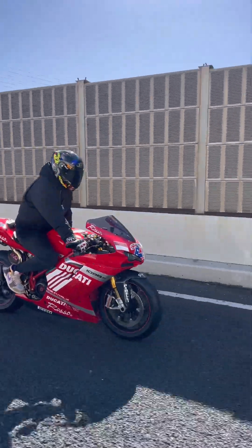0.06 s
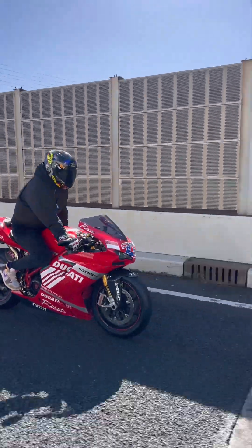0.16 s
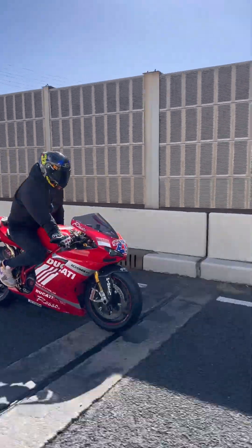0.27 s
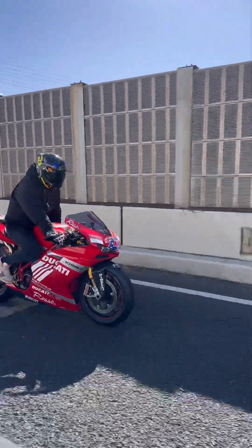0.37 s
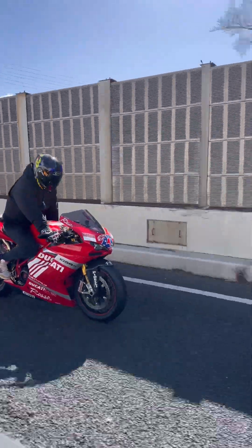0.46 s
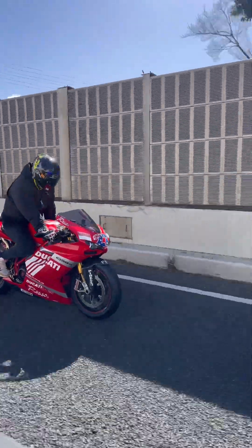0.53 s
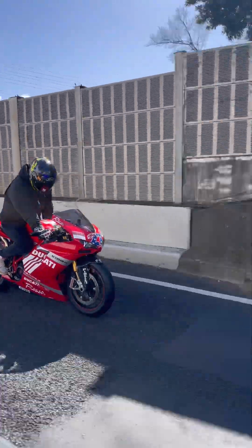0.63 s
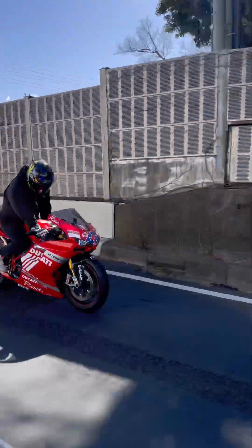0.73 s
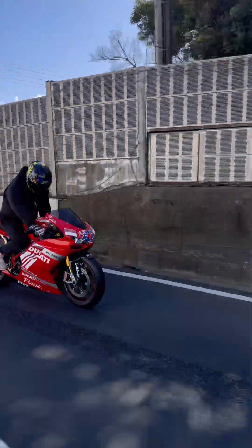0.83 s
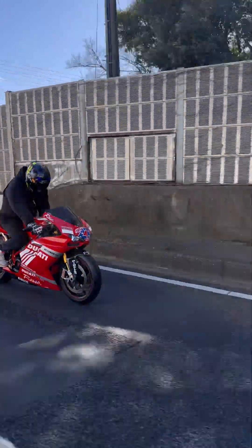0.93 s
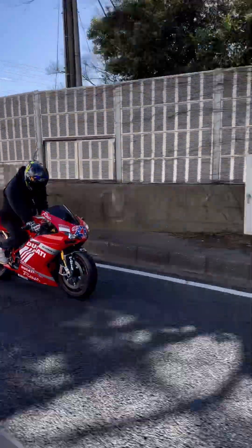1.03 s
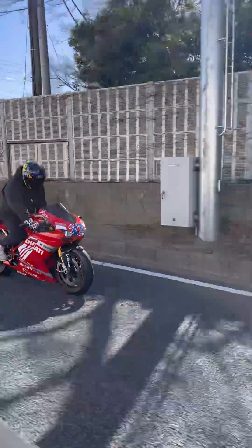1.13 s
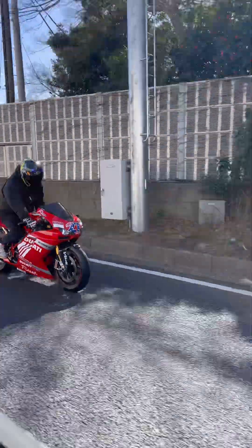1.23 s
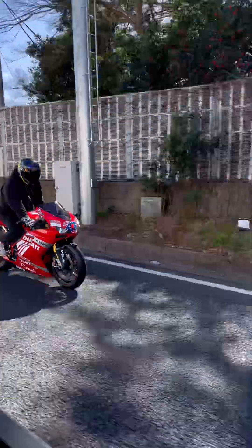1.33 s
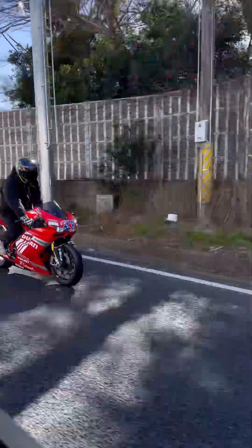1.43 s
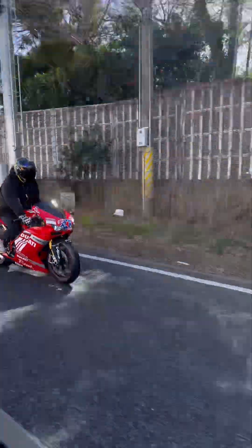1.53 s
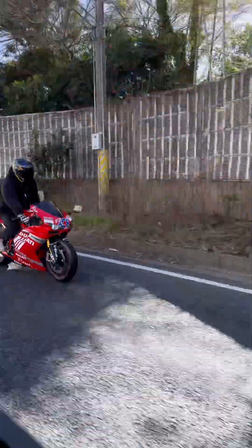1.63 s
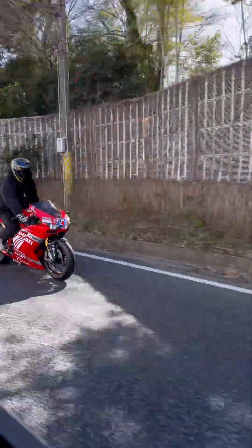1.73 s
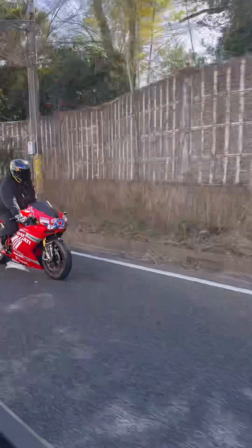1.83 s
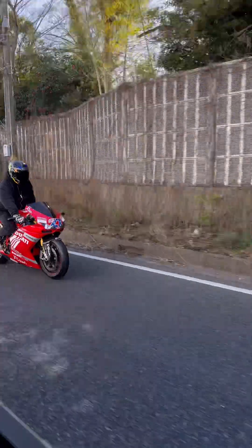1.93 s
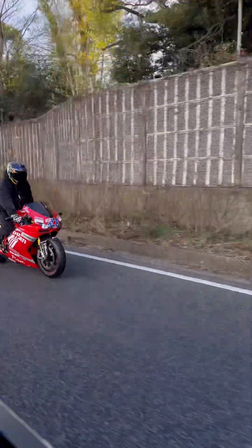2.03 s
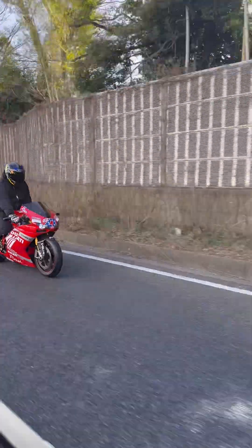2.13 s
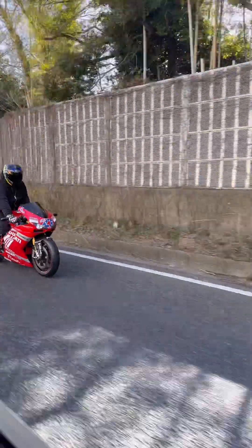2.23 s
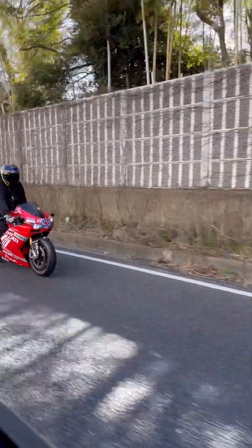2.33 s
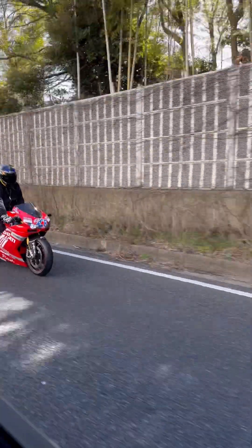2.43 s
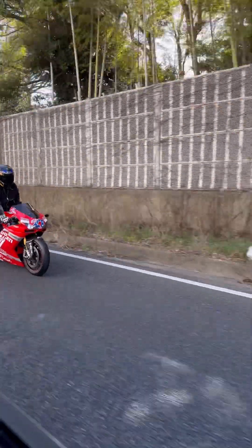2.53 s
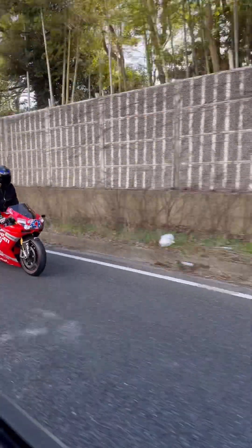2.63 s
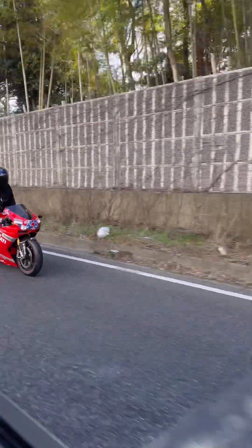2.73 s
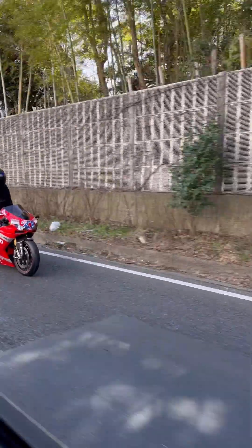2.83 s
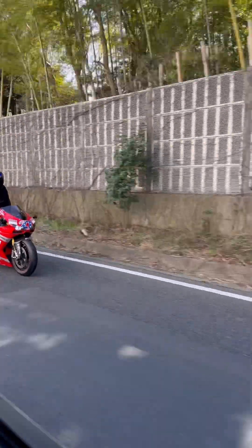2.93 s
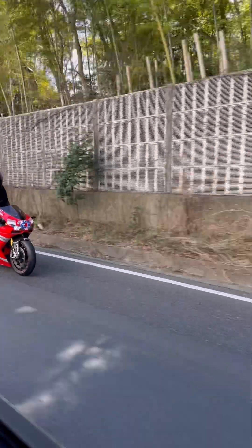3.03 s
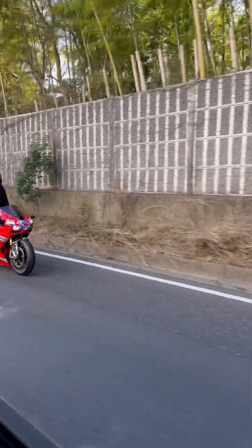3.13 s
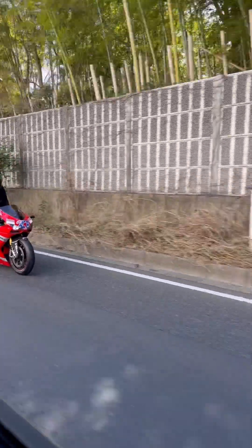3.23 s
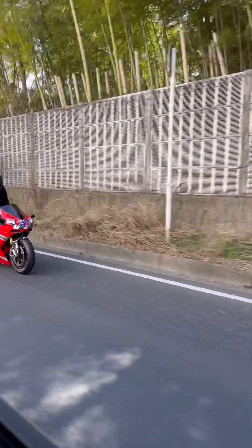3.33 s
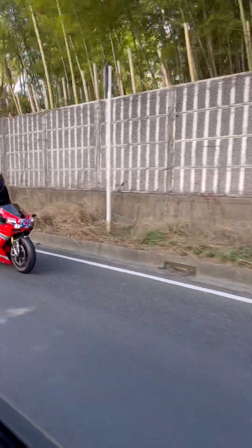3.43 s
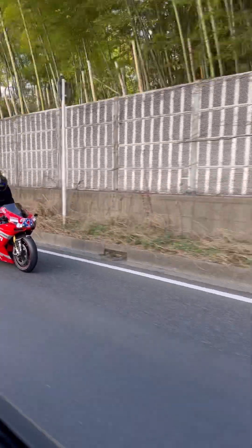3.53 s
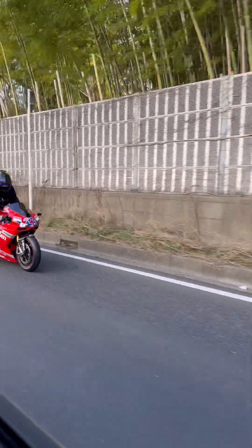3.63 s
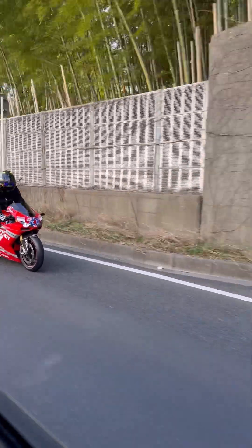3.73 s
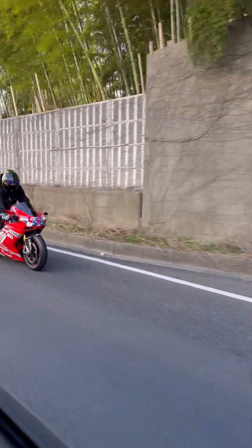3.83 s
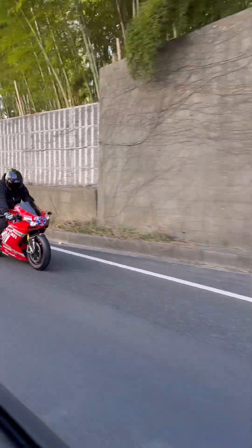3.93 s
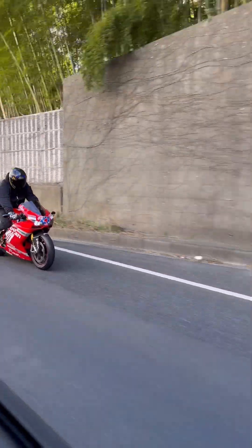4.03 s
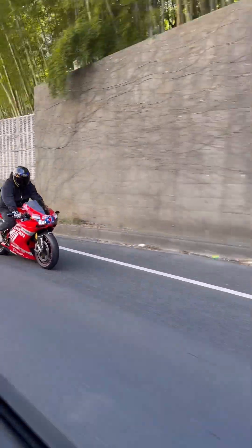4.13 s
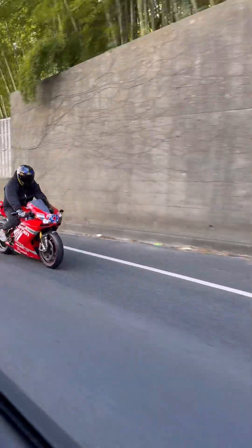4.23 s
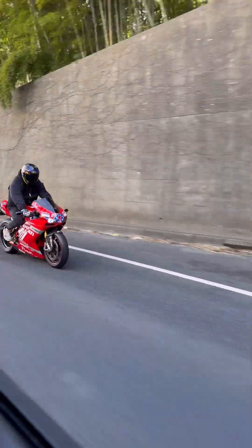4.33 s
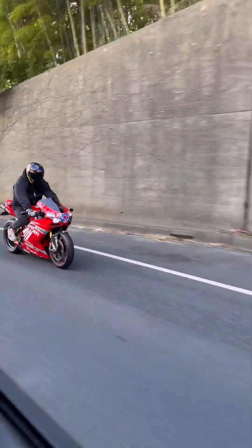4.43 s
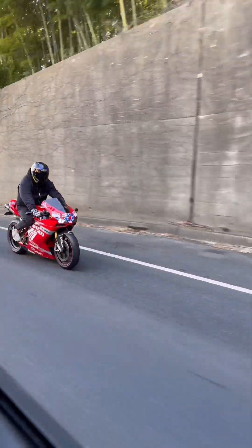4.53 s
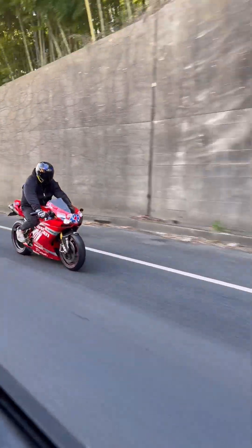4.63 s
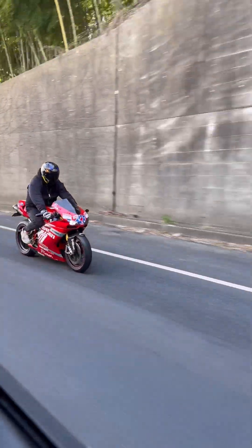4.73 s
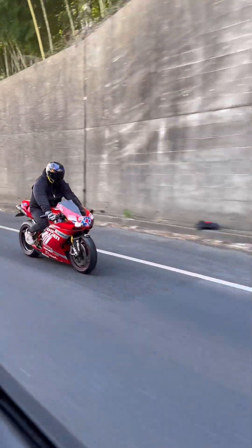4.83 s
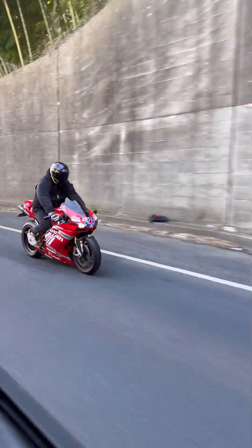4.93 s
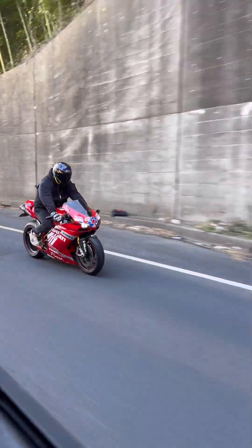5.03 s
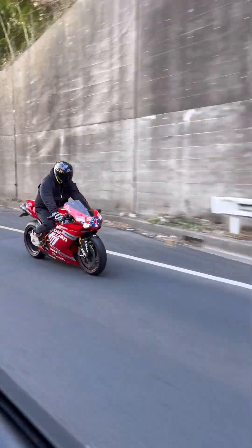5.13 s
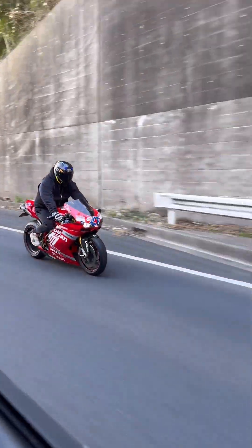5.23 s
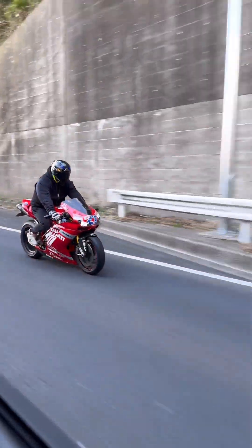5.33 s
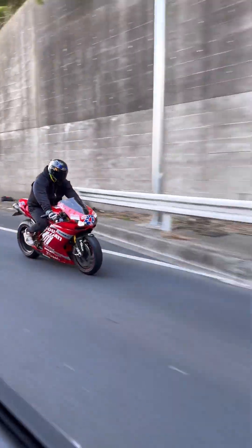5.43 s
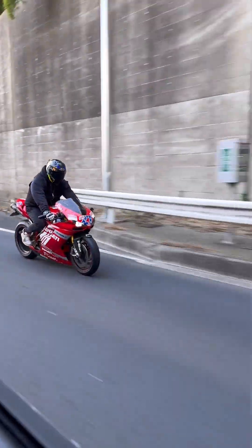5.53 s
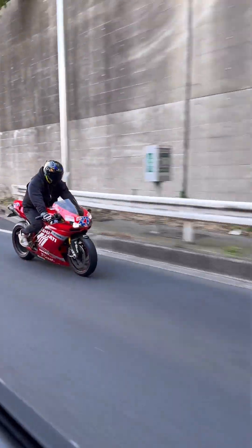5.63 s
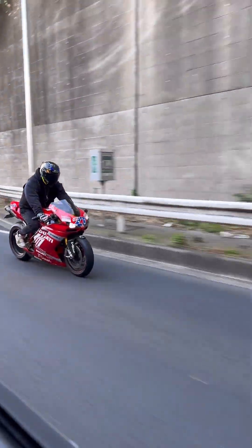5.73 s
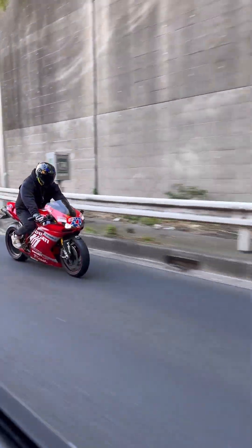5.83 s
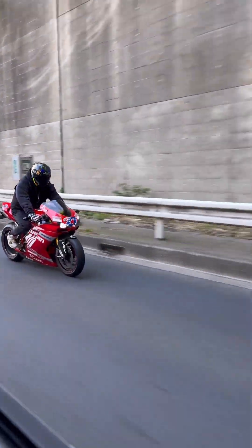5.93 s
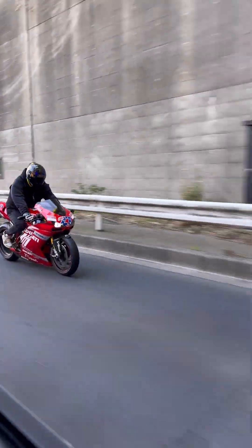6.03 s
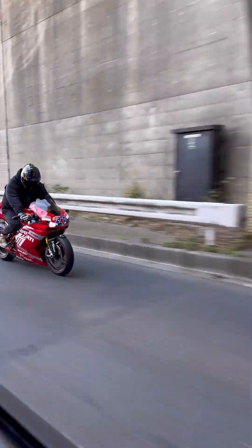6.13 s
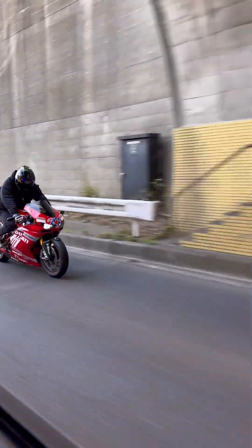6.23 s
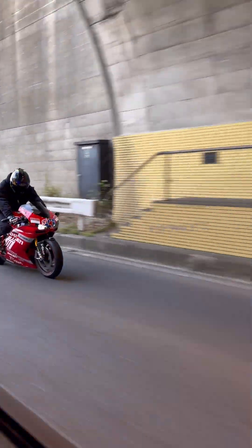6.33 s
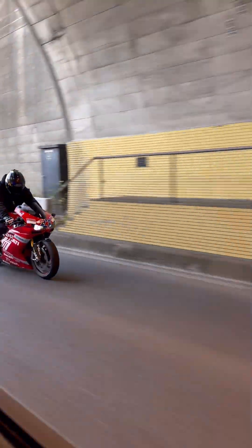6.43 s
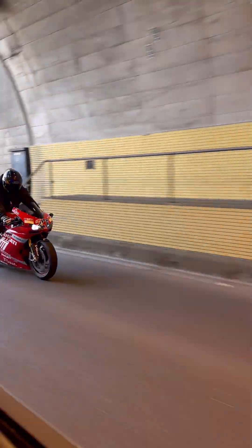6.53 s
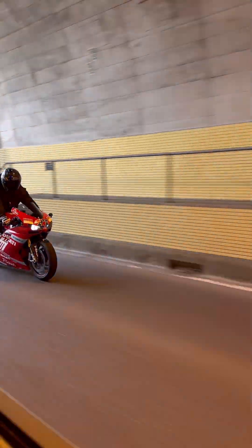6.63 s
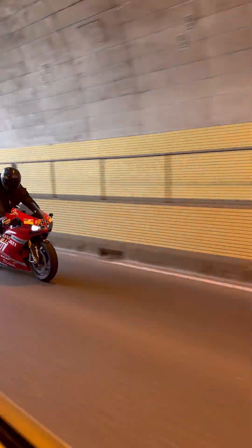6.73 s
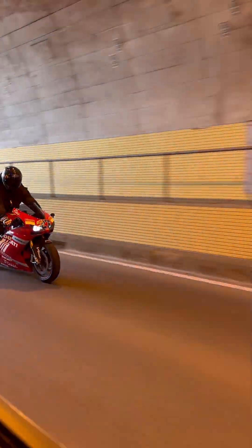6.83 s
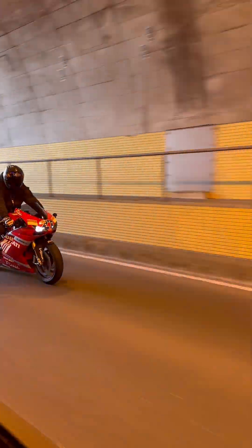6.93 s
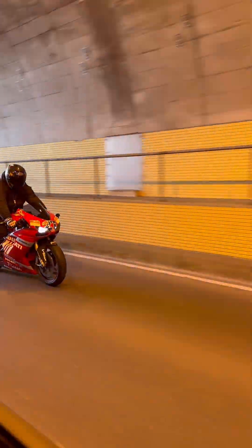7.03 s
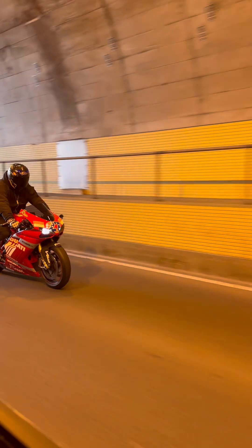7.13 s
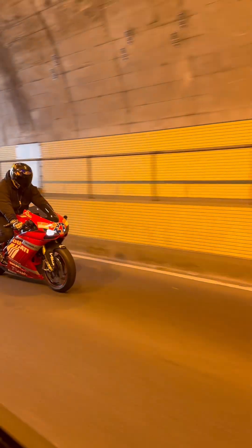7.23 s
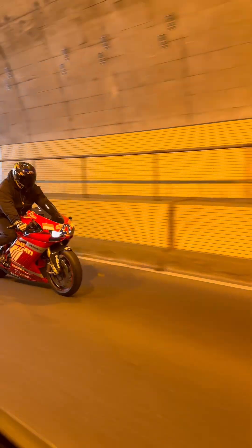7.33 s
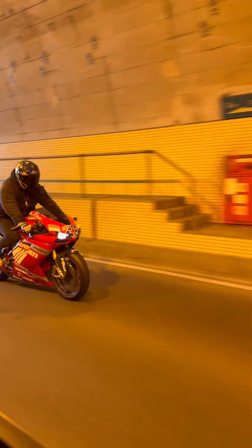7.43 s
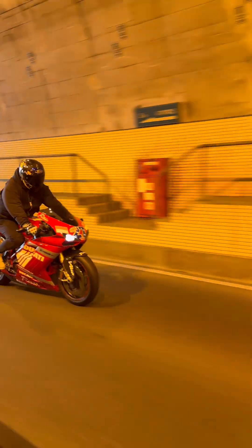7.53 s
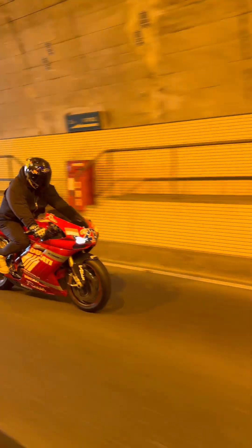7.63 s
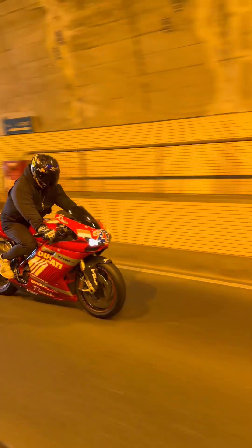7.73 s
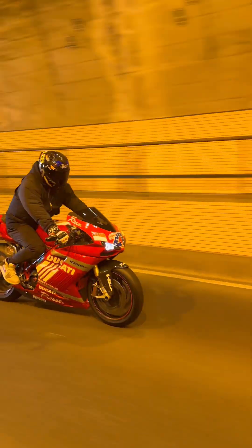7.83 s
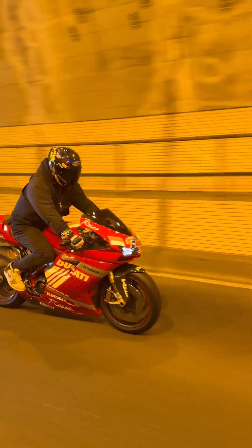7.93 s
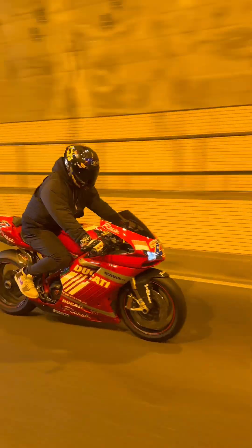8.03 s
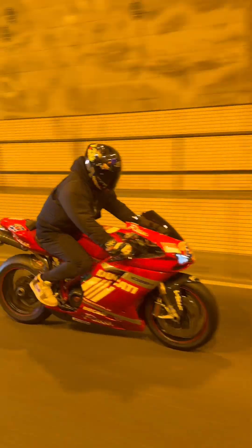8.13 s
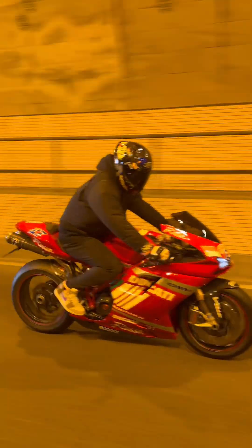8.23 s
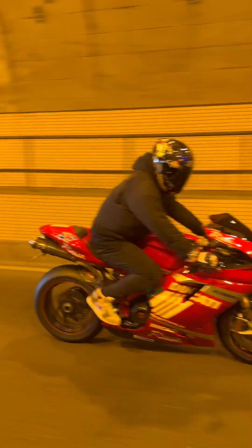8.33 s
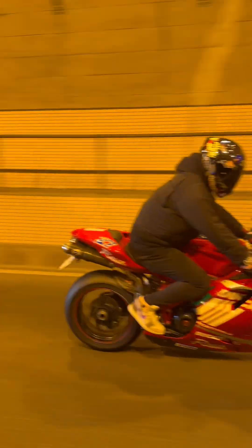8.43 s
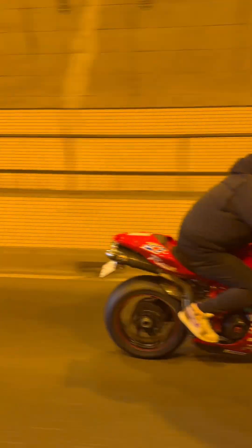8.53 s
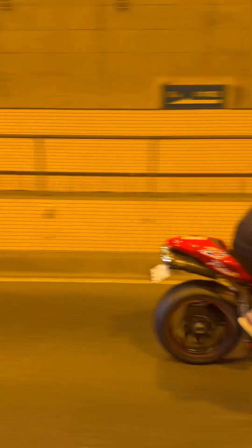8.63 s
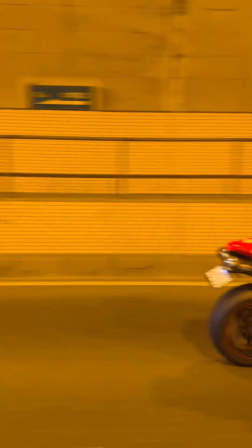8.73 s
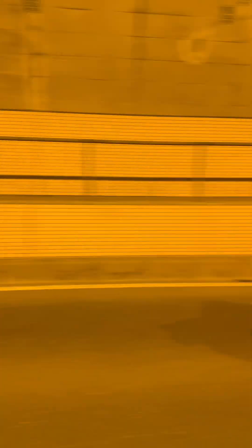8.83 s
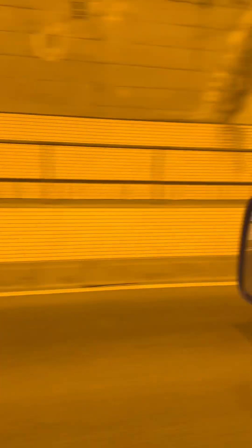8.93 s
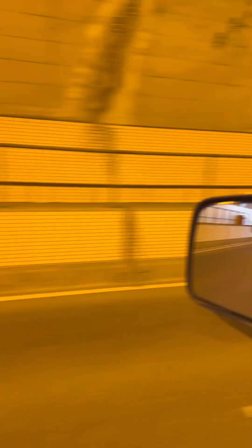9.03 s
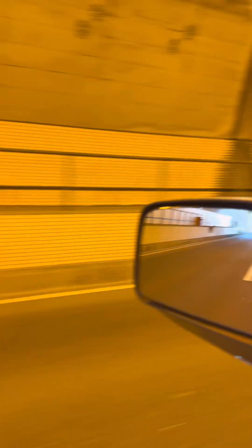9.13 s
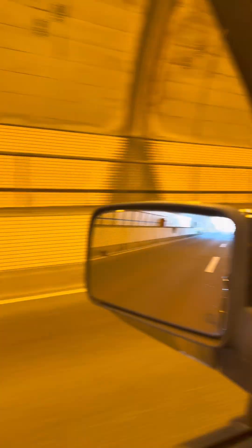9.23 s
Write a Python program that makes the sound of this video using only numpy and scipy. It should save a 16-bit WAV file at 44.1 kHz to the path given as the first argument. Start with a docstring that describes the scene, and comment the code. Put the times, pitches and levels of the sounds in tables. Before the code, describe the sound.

From 0 s a twin-cylinder sport motorcycle cruises almost level with a car window: deep, uneven exhaust throb, dry clutch and valve clatter, thin gear tones, chain and tyre hiss, over soft car road and air noise. By 1-3.5 s it sits a few metres behind, quieter and steady, pitch creeping up. Around 4.1 s a tall wall roughens the note; throttle swells to about 4.7 s, then pitch drops abruptly and overrun burbles while revs sag until 6 s, with a faint metallic clack at 5.8 s. From 6.3 s it pulls hard into a tunnel, growing louder, ragged and densely echoing, revs climbing to 7.8 s. At 7.9-8.15 s an upshift breaks the note and drops pitch, with short gear whines. It accelerates again, passes closest at 8.5 s with whine and clatter, then moves ahead, exhaust still strong and rising until 9.3 s.

```python
"""An uneven V-twin roar beside a car: the motorcycle cruises, rolls on, eases off, pulls hard into a tunnel,
shifts up and overtakes, heard at the car's window. Harmonics and rumble of the two firings sound the pipes;
ticks and noise ring the clutch and engine casings; coloured noise gives tyres and air; gears add thin tones.
Roadside reflections scatter the sound and dense tunnel echoes smear it."""
import sys
import numpy as np
from scipy import signal
from scipy.fft import rfft, irfft
from scipy.io import wavfile
from scipy.ndimage import uniform_filter1d, map_coordinates

SR = 44100
rng = np.random.default_rng(int(sys.argv[2]) if len(sys.argv) > 2 else 0)


def generate_wav(sig):
    """Save sig (samples, or channels by samples) to the path in sys.argv[1] as 16-bit PCM at SR."""
    pcm = np.round(np.clip(np.atleast_2d(sig).T, -1, 1) * 32767).astype(np.int16)
    wavfile.write(sys.argv[1], SR, pcm)


N = 408807
TIME = np.arange(N) / SR
FREQS = np.fft.rfftfreq(2 ** 19, 1 / SR)

# Engine speed. Each row: time in seconds, four-stroke cycles per second in Hz.
SPEED_HZ = [(0.0, 40.54), (0.62, 40.63), (1.03, 40.74), (3.59, 43.52), (4.1, 44.6), (4.44, 45.92),
            (4.7, 47.54), (4.79, 44.05), (4.85, 43.9), (4.9, 45.3), (4.98, 45.67), (5.6, 42.78),
            (6.01, 41.43), (6.2, 42.7), (6.27, 42.05), (6.89, 46.77), (7.41, 50.09), (7.8, 55.14),
            (7.95, 49.84), (8.05, 42.53), (8.16, 39.73), (8.52, 42.76), (9.19, 47.06), (9.27, 47.96)]
# Pipe voices, one per way of riding. Each row: multiple of the cycle rate, relative level in dB.
ABREAST = [(1, -15.5), (2, 1.5), (3, -18), (4, -1), (5, -9), (6, -15), (7, -25.5), (8, -30), (9, -16),
           (10, -19), (11, -37), (12, -22.5), (13, -37), (14, -16)]
CRUISE = [(1, -9), (2, -1.5), (3, -14.5), (4, -0.5), (5, 0.5), (6, -8.5), (7, -11), (8, -11), (9, -27),
          (10, -19), (11, -26), (12, -20.5), (13, -18), (14, -17)]
ROLL_ON = [(1, -0.5), (2, -3), (3, -5.5), (4, -22), (5, 3), (6, 1.5), (7, -6), (8, -3), (9, -11), (10, -18),
           (11, -39), (12, -24), (13, -19), (14, -24)]
OVERRUN = [(1, -12.5), (2, -2), (3, 1), (4, -31), (5, -7.5), (6, -34), (7, -18.5), (8, -20.5), (9, -39),
           (10, -35), (11, -37), (12, -36), (13, -24.5), (14, -33)]
FEATHER = [(1, -8.5), (2, -4.5), (3, -4), (4, -0.5), (5, -3), (6, -11), (7, -28.5), (8, -6.5), (9, -17.5),
           (10, -34), (11, -22.5), (12, -22.5), (13, -20), (14, -24)]
FULL = [(1, -10.5), (2, -12.5), (3, -6.5), (4, -16.5), (5, -4.5), (6, 1.5), (7, -17), (8, -6.5), (9, -10),
        (10, -28), (11, -27), (12, -16.5), (13, -40), (14, -27)]
TOP_REVS = [(1, -1.5), (2, -7), (3, -6), (4, -20), (5, 3.5), (6, -2), (7, -10), (8, -12.5), (9, -8),
            (10, -20), (11, -21), (12, -16.5), (13, -20), (14, -15.5)]
PASSING = [(1, -7.5), (2, -0.5), (3, 0.5), (4, -21), (5, -9), (6, -2), (7, -8), (8, 0), (9, -3.5),
           (10, -17), (11, -14.5), (12, -11.5), (13, -22.5), (14, -26)]
AHEAD = [(1, -1), (2, -5), (3, 2.5), (4, -23.5), (5, 3), (6, -1.5), (7, -10), (8, -3), (9, -7), (10, -4),
         (11, -13), (12, -5), (13, -9), (14, -7)]
PULL = [(1, -11), (2, -5), (3, -5), (4, -19.5), (5, -3), (6, -8.5), (7, -19), (8, -3.5), (9, -18),
        (10, -20), (11, -21.5), (12, -13), (13, -27), (14, -17)]
SHIFT = [(1, -12), (2, -1), (3, -4.5), (4, -14), (5, -5), (6, -14.5), (7, -6.5), (8, -11), (9, -25),
         (10, -23), (11, -22), (12, -23), (13, -27), (14, -23)]
FLAT_OUT = [(1, -2), (2, -4.5), (3, -8), (4, -1.5), (5, -4), (6, -4.5), (7, -9), (8, -13), (9, -6.5),
            (10, -14), (11, -17.5), (12, -11), (13, -17.5), (14, -22)]
NEXT_GEAR = [(1, -9.5), (2, -1.5), (3, -6), (4, -10), (5, -4.5), (6, -1), (7, -18), (8, 0), (9, -10.5),
             (10, -13.5), (11, -9.5), (12, -11), (13, -20), (14, -17)]
COAST = [(1, -12), (2, -1), (3, -1.5), (4, -0.5), (5, -0.5), (6, -6), (7, -19), (8, -10.5), (9, -22),
         (10, -26), (11, -22), (12, -22.5), (13, -16), (14, -18)]
# Ways of riding, blended in the gaps. Each row: voice, start in seconds, end in seconds, throttle 0-1,
# level of the pipe note's harmonics from the third up in dB, low burble in dB re the note.
RIDE = [(ABREAST, 0, 0.3, 0.18, -23, -11), (ABREAST, 0.44, 0.86, 0.23, -25, -5),
        (CRUISE, 2.24, 3.74, 0.13, -25, -12), (ROLL_ON, 4.33, 4.68, 0.59, -20.5, -11.5),
        (OVERRUN, 4.78, 4.82, .05, -18.5, -5.5), (OVERRUN, 4.89, 5.11, .05, -16, -12),
        (OVERRUN, 5.22, 5.38, .05, -21, -4), (OVERRUN, 5.42, 5.45, .05, -20, -2),
        (COAST, 5.48, 5.51, .05, -28.5, -2), (COAST, 5.57, 5.72, .2, -21, -2),
        (FEATHER, 5.79, 5.97, .2, -19.5, -7), (FEATHER, 6.05, 6.19, .2, -20, -4),
        (FEATHER, 6.23, 6.25, .3, -24.5, -4), (FEATHER, 6.3, 6.44, 0.87, -18.5, -10),
        (FULL, 6.626, 6.79, 0.94, -14, -16.5), (FULL, 6.82, 6.85, 0.69, -18, -9.5),
        (FULL, 6.9, 7.05, 0.78, -13, -15), (PULL, 7.13, 7.32, 0.88, -17.5, -11.5),
        (TOP_REVS, 7.44, 7.56, 0.9, -14.5, -15), (FLAT_OUT, 7.66, 7.85, 0.9, -18.5, -10),
        (SHIFT, 7.9, 8.03, .1, -18, -2.5), (SHIFT, 8.07, 8.11, .1, -18.5, -2),
        (NEXT_GEAR, 8.2, 8.47, 0.94, -15, -9.5), (PASSING, 8.62, 9.02, 0.55, -12, -22.5),
        (AHEAD, 9.1, 9.3, 0.52, -16.5, -16.5)]
# Motorcycle position. Each row: time in seconds, metres ahead of the window.
PLACE_M = [(0, -0.5), (0.3, -1), (1.1, -3.5), (2.4, -7), (4.1, -6.5), (5.2, -5.5), (6.3, -5), (7.2, -4),
           (7.75, -3.5), (8.5, 0), (8.8, 1.55), (9.27, 5.5)]
# Brief swells and dips of the bass. Each row: time in seconds, half length in seconds,
# thump once a cycle in dB, boom once a crank turn in dB.
BASS_SWELLS = [(.25, .15, -4, 0.5), (0.915, 0.39, -2.5, -5.5), (1.156, 0.1, -3, -13),
               (1.606, 0.078, -6.5, -15.5), (4.15, 0.088, -8.5, -2.5), (4.395, 0.13, 4.5, -2),
               (4.654, 0.076, -2.5, 9), (5.87, .04, -1.5, -3), (6.418, 0.27, -1.5, -16),
               (7.116, 0.041, -9, -5), (7.272, 0.088, 8, -10), (7.498, 0.064, -0.5, 6.5),
               (7.628, 0.035, -13, 0), (7.757, 0.063, 6.5, 0), (7.976, 0.084, 4.5, 2.5),
               (8.362, .06, 0, 5.5), (8.78, 0.033, 1, -10)]

# Resonances. Each row: centre in Hz, width in Hz, relative level in dB.
# Engine casings, columns as above.
CASE_MODES = [(1770, 300, -5), (2090, 140, 0), (2296, 160, -5), (2544, 160, -5.5), (5520, 250, -11.5),
              (6080, 460, -19)]
# Clutch plates, columns as above.
CLUTCH_MODES = [(2634, 150, -5), (2782, 96, -2.5), (2960, 130, -11.5)]
# Front covers, heard from ahead of the motorcycle; columns as above.
COVER_MODES = [(2160, 70, -2.5), (2190, 67, 0), (2470.2, 140, -6.5), (6000, 340, -18)]
# Thin header pipes, columns as above.
HEADER_MODES = [(780, 99, -7.5), (1014, 100, 6.5), (1150, 80, -11)]

# Spectra. Each row: frequency in Hz, relative level in dB per Hz.
# Low rumble of uneven firings, columns as above.
BURBLE_SPECTRUM = [(30, -29.5), (62, -6), (95, 3.5), (135, 1), (190, -8), (280, -5), (400, -20.5),
                   (800, -34.5)]
# Roar of uneven firings above the rumble, columns as above.
ROAR_SPECTRUM = [(120, -22.5), (210, -2), (290, -4), (360, -0.5), (450, -13), (600, -17.5), (800, -13),
                 (1500, -35.5)]
# Growl between the harmonics, columns as above.
GROWL_SPECTRUM = [(200, -26), (290, -3.5), (350, 2.5), (410, -5), (480, -7.5), (560, -16), (800, -33.5)]
# Exhaust pulse fronts, columns as above.
BARK_SPECTRUM = [(400, -12.5), (560, -6), (680, 4), (800, 0), (930, -9.5), (1100, -16), (1500, -14),
                 (3000, -44.5)]
# Turbulent exhaust gas, columns as above.
RASP_SPECTRUM = [(200, -5.5), (400, 1), (600, 3.5), (850, -2), (1100, -1.5), (1400, -4.5), (1750, -7),
                 (2300, -12), (3500, -13.5), (8000, -33)]
# Hiss of chain, tyres and intake, columns as above.
RUSH_SPECTRUM = [(200, -12.5), (600, 7), (1000, 4.5), (1500, -1), (2000, 9.5), (2900, 2.5), (3600, 1),
                 (4700, 0.5), (5800, 2.5), (7200, -0.5), (8800, 2), (9700, -1.5), (11000, -20.5)]
# The car's tyres and window air, columns as above.
ROAD_SPECTRUM = [(25, -25.5), (45, 3), (100, -4.5), (200, -1), (400, -10), (700, -24.5), (1100, -16.5),
                 (2000, -14), (4000, -39), (9000, -39.5)]

# Level laws. Columns: dB abreast in the open, share of the 1 / distance law, dB per octave of revs,
# dB added at full throttle, dB added in the tunnel, dB added once ahead.
# Exhaust bark, columns as above.
BARK_LEVEL = (-47, 0, 2, 1, 7.5, 13)
# Exhaust gas, columns as above.
GAS_LEVEL = (-38, 0.24, 11.5, 2, 8.5, -8)
# Clutch and valve gear, columns as above.
CLATTER_LEVEL = (-31.5, 0.86, 7, 0, 4.5, -7.5)
# Chain, tyres and intake, columns as above.
RUSH_LEVEL = (-29.5, 1.22, 7.5, -0.5, 2.5, -6)
# Roar in dB re the pipe note, columns as above.
ROAR_LEVEL = (-25, 0, 8, 4, 11.5, -7.5)
# Tunnel echo in dB re the direct sound, columns as above.
ECHO_LEVEL = (-26, -0.74, 3, 0.5, 17, -6)
# Header ring, columns as above.
HEADER_LEVEL = (-47, 0, 6, 1.5, -3.5, -2)
# Growl level. Each row: time in seconds, level in dB.
GROWL_LEVEL_DB = [(0, -56), (5.7, -52.5), (6.4, -35), (7.0, -27), (7.25, -27.5), (7.55, -24.5),
                  (7.85, -21.5), (8.08, -25.5), (8.35, -23), (8.7, -21.5), (9.0, -24.5), (9.27, -30)]

# Gearbox tones in the shift. Each row: start in seconds, length in seconds, from Hz, to Hz, level in dB.
SHIFT_WHINES = [(7.952, .11, 2701, 2500, -34), (8.102, 0.15, 2750, 2860, -31),
                (8.258, .13, 2861, 2762, -34)]
# Engine and gearbox tones that stand out for a while. Each row: multiple of the cycle rate,
# centre in seconds, half length in seconds, level in dB.
OVERTONES = [(19, 0.23, 0.32, -40), (17.7, .95, .3, -46), (14, 1.9, 0.38, -47), (17, 1.6, 0.54, -48),
             (28.3, 1.7, .55, -47), (23.1, 2.5, 0.65, -51), (17, 3.55, .4, -46.5), (17.86, 3.4, 0.56, -49),
             (16.1, 4.4, 0.28, -42.5), (23.2, 4.4, .35, -46.5), (52, 2.2, .7, -45), (58.3, 3.0, 1.0, -48),
             (45, 7.3, .2, -36.5)]
# Microphone port phase. Each row: frequency in Hz, left lead in radians.
PORT_PHASE_RAD = [(250, 0), (600, -0.75), (1120, 0.1), (1600, -0.45), (2050, -1.2), (2580, 0), (3880, 1.01),
                  (5340, 0.25), (7750, -1.63), (10400, -3)]
# Microphone port balance. Each row: frequency in Hz, left minus right in dB.
PORT_BALANCE_DB = [(200, 0), (380, -0.5), (700, -4), (1290, -1), (2380, -0.3), (4400, 1), (8120, 0.3),
                   (15000, 0)]
# Delays of paths off walls that rush past, in seconds.
PATHS_S = [0, .011, .019, .031, .046]

SECOND_FIRING_CYCLES = 270 / 720
CRUISE_HZ = 41  # reference speed of the level laws
TOP_HZ = 15800
LANE_M = 2.75  # sideways gap to the car
TUNNEL_AT_S, TUNNEL_CLOSES_S = 5.46, 0.53  # the walls close in round the portal
WALL_AT_S, WALL_CLOSES_S, WALL_UNREST = 4.1, .08, 0.39  # echoes off the tall wall shake the note
SHADOW_FROM_M, SHADOW_EDGE_M = 2.02, 0.51  # once ahead, the motorcycle's own body hides its engine
SHIFT_AT_S, SHIFT_LENGTH_S, SHIFT_UNREST = 7.9, 0.17, 1.37  # the note breaks up as the throttle shuts
UNEVEN_FLUTTER = 0.61  # uneven burning shakes the note as the tunnel's echoes do
BASS_FLUTTER_DB, BASS_FLUTTER_PER_S = (2.5, -0.24), 16  # thump and boom
CLUTCH_DB, CLUTCH_FADE_DB_PER_M, CLUTCH_TUNNEL_DB = -1.5, 2.1, 5.5  # clutch ring re the casings
COVER_DB, COVER_FROM_M, COVER_EDGE_M = -1, 5.4, 0.46  # re the casings; how far behind they come into view
GEAR_TEETH = 32
WHINE_DB, WHINE_BEAM_DB = -51.5, 23  # level to all sides, and the gain in its beam
BEAM_AT_M, BEAM_WIDTH_M = 0.42, 1.26


def undb(db):
    """Decibels to gain."""
    return 10 ** (np.asarray(db) / 20)


def unit(x):
    """Scale to rms 1."""
    return x / np.sqrt(np.mean(x ** 2))


def curves(table):
    """Each column of a table as a value per sample."""
    s, *columns = np.transpose(table)
    return [np.interp(TIME, s, column) for column in columns]


def across(points):
    """Join (Hz, value) points on a log-frequency axis."""
    hz, value = np.transpose(points)
    return np.interp(np.log(FREQS + 1), np.log(hz), value)


def filtered(x, response):
    """Apply a frequency response."""
    size = 2 * (len(FREQS) - 1)
    return irfft(rfft(x, size) * response)[..., :N]


def ring(x, modes):
    """Drive a set of band resonances; rms 1."""
    response = 0
    for hz, width_hz, db in modes:
        damping = 1j * FREQS * width_hz
        response = response + undb(db) * damping / (hz * hz - FREQS ** 2 + damping)
    return unit(filtered(x, response))


def colour(x, points):
    """Give a sound a spectrum; rms 1."""
    return unit(filtered(x, undb(across(points))))


def walk(rate_hz):
    """Smooth chance with a spread near 1."""
    k = int(SR / rate_hz)
    steps = np.repeat(rng.standard_normal(N // k + 1), k)
    return 1.2 * uniform_filter1d(steps, k)[:N]


def step(x):
    """A smooth rise from 0 to 1 round x = 0."""
    return .5 + .5 * np.tanh(x / 2)


def pulses(cycle, places, scatter_db, jitter_ms=0.029):
    """A pulse at each of these places in the engine cycle, with chance in timing and size."""
    passes = (np.arange(int(cycle[-1]))[:, None] + np.array(places)).ravel()
    at = np.interp(passes, cycle, np.arange(N))
    late, loud = rng.standard_normal((N // 100, 2))[:len(at)].T
    at = np.clip(at + late * jitter_ms * SR / 1000, 0, N - 2)
    whole, part, size = at.astype(int), at % 1, undb(scatter_db * loud)
    # split each pulse over two samples
    return np.bincount(whole, size * (1 - part), N) + np.bincount(whole + 1, size * part, N)


def firing_pulses(cycle, scatter_db, jitter_ms=0.029):
    """The two unevenly spaced firings of the V-twin as pulses."""
    return pulses(cycle, [0, SECOND_FIRING_CYCLES], scatter_db, jitter_ms)


def puffs(cycle, lag_cycles, length_cycles):
    """An envelope that jumps a lag after both firings and dies away."""
    first = np.exp(-((cycle - lag_cycles) % 1) / length_cycles)
    second = np.exp(-((cycle - lag_cycles - SECOND_FIRING_CYCLES) % 1) / length_cycles)
    return first + second


def echoes(x, t60_s):
    """A dense train of fading reflections that keeps the power."""
    t = np.arange(SR) / SR
    tail = rng.standard_normal(SR) * np.exp(-np.log(1000) * t / t60_s)
    return signal.fftconvolve(x, tail / np.linalg.norm(tail))[:N]


def roadside(x, t60_s, count=7):
    """Close reflections from bodywork, road and wall; patterns crossfade as the scenery passes."""
    place = TIME / TIME[-1] * (count - 1)
    return sum(np.sqrt(np.clip(1 - abs(place - k), 0, 1)) * echoes(x, t60_s) for k in range(count))


def sweeping(x, sway_ms, rate_hz):
    """Reflections off walls that rush past: each path varies in length and bends the pitch a little."""
    out = 0
    for delay_s in PATHS_S:
        path = np.arange(N) - (delay_s + sway_ms / 1000 * walk(rate_hz)) * SR
        out = out + map_coordinates(x, [path], order=2, mode="mirror")
    return out / np.sqrt(len(PATHS_S))


def in_tunnel(x, wet, t60_s=.8, spread=.45, sway_ms=1.6):
    """The concrete tube adds a long echo, blurred in pitch and partly different at each port."""
    blurred = sweeping(x, sway_ms, rate_hz=7)
    side = spread * echoes(blurred, t60_s) * np.array([[1], [-1]])
    return (x + wet * (echoes(blurred, t60_s) + side)) / np.hypot(1, wet)


def road(road_db=-36, gust_db=2.5):
    """The car's own tyres and the air at its window: gusting coloured noise."""
    return undb(road_db + gust_db * walk(7.2)) * colour(rng.standard_normal(N), ROAD_SPECTRUM)


def rush(cycle, throb=0.85, flicker_db=1.63, gust_db=0.6):
    """Chain, tyres and intake air of the motorcycle hiss, throbbing with the engine."""
    swell = 1 + throb * puffs(cycle, lag_cycles=.1, length_cycles=0.33)
    swell = swell * undb(flicker_db * walk(25) + gust_db * walk(11.0))
    return colour(swell * rng.standard_normal(N), RUSH_SPECTRUM)


def clack(at_s=5.8, length_s=0.027, peak_db=-27):
    """A brief metallic clack from the motorcycle: a decaying burst of resonant noise."""
    burst = (TIME > at_s) * np.exp(-abs(TIME - at_s) / length_s)
    modes = [(2800, 500, -7), (5800, 1000, -8), (10500, 3000, -7)]  # Hz, width Hz, dB
    return undb(peak_db) * burst * ring(rng.standard_normal(N), modes)


def shift_whine(waver_rad=.3):
    """Short gliding tones swell and fade as the gears let go and take up the load again."""
    out = 0
    for at_s, length_s, from_hz, to_hz, db in SHIFT_WHINES:
        part = np.clip((TIME - at_s) / length_s, 0, 1)
        phase = 2 * np.pi * np.cumsum(from_hz + (to_hz - from_hz) * part) / SR
        out = out + undb(db) * np.sin(np.pi * part) * np.sin(phase + waver_rad * walk(35))
    return np.sqrt(2) * out


def gear_whine(cycle, along_m, waver_rad=0.2, flutter_db=4.5):
    """The crank's drive gear turns twice a cycle; its mesh tone beams out of the open clutch cover."""
    mesh = 2 * np.pi * 2 * GEAR_TEETH * cycle + waver_rad * walk(35)
    beam = np.exp(-((along_m - BEAM_AT_M) / BEAM_WIDTH_M) ** 2)
    gain = undb(WHINE_DB + WHINE_BEAM_DB * beam + flutter_db * walk(30))
    gain = gain * LANE_M / np.hypot(along_m, LANE_M)
    return np.sqrt(2) * gain * np.sin(mesh)


def overtones(cycle, waver_rad=0.5, flutter_db=2):
    """Thin tones tied to engine speed come and go as the angle to the motorcycle changes."""
    out = 0
    for k, at_s, length_s, db in OVERTONES:
        gain = undb(db + flutter_db * walk(13)) * np.exp(-((TIME - at_s) / length_s) ** 2)
        out = out + gain * np.sin(2 * np.pi * k * cycle + waver_rad * walk(12))
    return np.sqrt(2) * out


def clatter(cycle, clutch_db, cover, rattle_db=-1):
    """Valve gear ticks in step with the cams and the dry clutch rattles at each firing."""
    cams = pulses(cycle, [.09, .43, .61, .84], scatter_db=2.5, jitter_ms=0.089)
    ticks = unit(roadside(cams, t60_s=0.063, count=14))
    rattle = unit(puffs(cycle, lag_cycles=0.12, length_cycles=0.98) * rng.standard_normal(N))
    drive = ticks + undb(rattle_db) * rattle
    clutch = undb(clutch_db)
    out = ring(drive, CASE_MODES) + clutch * ring(drive, CLUTCH_MODES)
    out = out + cover * ring(rattle + .5 * ticks, COVER_MODES)
    return out / np.sqrt(1 + clutch ** 2 + cover ** 2)


def headers(cycle):
    """The firings ring the thin header pipes: a ladder of fine, clean overtones."""
    firings = firing_pulses(cycle, scatter_db=-1.5, jitter_ms=.015)
    return ring(roadside(firings, t60_s=0.065), HEADER_MODES)


def rasp(cycle):
    """A puff of turbulent gas follows each firing."""
    envelope = puffs(cycle, lag_cycles=.03, length_cycles=1.0)
    return colour(envelope * rng.standard_normal(N), RASP_SPECTRUM)


def bark(cycle):
    """The sharp fronts of the exhaust pulses, scattered by the roadside."""
    fronts = firing_pulses(cycle, scatter_db=3.0, jitter_ms=0.065)
    return colour(roadside(fronts, t60_s=0.087, count=14), BARK_SPECTRUM)


def burble(cycle, spectrum):
    """No two charges burn alike: the uneven part of the firings rumbles between the harmonics."""
    uneven = firing_pulses(cycle, scatter_db=1.5) * np.sign(rng.standard_normal(N))
    return colour(roadside(uneven, t60_s=0.091), spectrum)


def growl(cycle):
    """Under load the uneven firings tear the middle of the note into a ragged growl."""
    return undb(curves(GROWL_LEVEL_DB)[0]) * burble(cycle, GROWL_SPECTRUM)


def riding():
    """Throttle, pipe note dB and burble dB, held through each way of riding."""
    return curves([(s, *controls) for _, start, end, *controls in RIDE for s in (start, end)])


def bass_swells():
    """Gains of the two lowest harmonics: brief swells and dips, and a flutter."""
    swells_db = sum(np.outer(db, np.exp(-((TIME - at_s) / length_s) ** 2))
                    for at_s, length_s, *db in BASS_SWELLS)
    flutter_db = np.array([db * walk(BASS_FLUTTER_PER_S) for db in BASS_FLUTTER_DB])
    return undb(swells_db + flutter_db)


def pipe_note(cycle, note_db, unrest, surge=0.067, flutter_db=0.84, unrest_flutter_db=4.5,
              second_size=0.77, ring_lag_rad=0.1492, drift_rad=0.77, unrest_drift_rad=0.96):
    """Low harmonics of the two firings; balance follows the riding, echoes and uneven burning shake it."""
    times = [s for _, start, end, *_ in RIDE for s in (start, end)]
    voices = np.repeat([np.array(voice)[:, 1] for voice, *_ in RIDE], 2, axis=0)
    sizes = np.array([np.interp(TIME, times, undb(db)) for db in voices.T])
    sizes *= undb(note_db) / np.linalg.norm(sizes[2:], axis=0)
    sizes[:2] *= bass_swells()
    out = 0
    for k, size in enumerate(sizes, 1):
        height = k / len(sizes)
        pair = np.angle(1 + second_size * np.exp(-2j * np.pi * k * SECOND_FIRING_CYCLES))
        # the pipes hold the higher harmonics back, and changing reflections shift and shake each one
        shift = -ring_lag_rad * k * k + drift_rad * walk(0.911)
        shift = shift + unrest_drift_rad * unrest * height * walk(12)
        depth_db = flutter_db + unrest_flutter_db * unrest * height
        flutter = undb(depth_db * walk(14) - depth_db ** 2 * np.log(10) / 20)  # keeps the mean power
        out = out + size * flutter * np.cos(2 * np.pi * k * cycle + pair + shift)
    return np.sqrt(2) * out * (1 + surge * walk(45))


def scene():
    """Engine speed, throttle, distance and tunnel drive the motorcycle; the car's noise lies under it."""
    speed_hz, along_m = curves(SPEED_HZ)[0], curves(PLACE_M)[0]
    throttle, note_db, burble_db = riding()
    cycle = np.cumsum(speed_hz) / SR
    near_db = 20 * np.log10(LANE_M / np.hypot(along_m, LANE_M))
    enclosed = step((TIME - TUNNEL_AT_S) / TUNNEL_CLOSES_S)
    ahead = step((along_m - SHADOW_FROM_M) / SHADOW_EDGE_M)
    causes = np.array([np.ones(N), near_db, np.log2(speed_hz / CRUISE_HZ), throttle, enclosed, ahead])

    def loudness(law):
        """A layer's gain from its level law."""
        return undb(np.dot(law, causes))

    tunnel = loudness(ECHO_LEVEL)
    wall = WALL_UNREST * step((TIME - WALL_AT_S) / WALL_CLOSES_S) * (1 - enclosed)
    shift = SHIFT_UNREST * np.exp(-((TIME - SHIFT_AT_S) / SHIFT_LENGTH_S) ** 2)
    unrest = tunnel + wall + shift + UNEVEN_FLUTTER * undb(burble_db)

    bright = loudness(RUSH_LEVEL) * rush(cycle)
    cover = undb(COVER_DB) * step((-along_m - COVER_FROM_M) / COVER_EDGE_M)
    clutch_db = CLUTCH_DB - CLUTCH_FADE_DB_PER_M * np.maximum(-along_m, 0) + CLUTCH_TUNNEL_DB * enclosed
    bright = bright + loudness(CLATTER_LEVEL) * clatter(cycle, clutch_db, cover) + clack()
    bright = bright + loudness(BARK_LEVEL) * bark(cycle) + loudness(GAS_LEVEL) * rasp(cycle)
    bright = bright + loudness(HEADER_LEVEL) * headers(cycle) + overtones(cycle)
    # sound scattered round the window frame reaches the ports unequally
    scattered = undb(-8) * roadside(bright, t60_s=0.12) * np.array([[1], [-1]])
    whines = gear_whine(cycle, along_m) + shift_whine()  # beamed straight at the window

    note = pipe_note(cycle, note_db, unrest)
    rumble = undb(burble_db) * burble(cycle, BURBLE_SPECTRUM)
    rumble = rumble + loudness(ROAR_LEVEL) * burble(cycle, ROAR_SPECTRUM)
    rumble = undb(note_db) * rumble + growl(cycle)
    note_echo = undb(-5) * tunnel * echoes(note, t60_s=0.84)
    low = note + in_tunnel(rumble + note_echo, tunnel, t60_s=1.0, spread=0.078)
    return low + whines + in_tunnel(bright, tunnel, t60_s=0.91, spread=0.18) + scattered + road()


def record(dry):
    """Two ports that differ in phase and level, a rumble filter, dull treble, rounded peaks, a steep cut."""
    lead = np.exp(.5j * across(PORT_PHASE_RAD)) * undb(across(PORT_BALANCE_DB) / 2)
    tone = undb(across([(18, -13), (36, 0), (9700, -0.5), (10600, -17.0)]))  # Hz, dB
    ports = filtered(dry, np.array([lead, 1 / lead]) * tone)
    rounded = ports / (1 + (ports / .95) ** 8) ** (1 / 8)
    return signal.sosfilt(signal.ellip(8, .2, 70, TOP_HZ, fs=SR, output="sos"), rounded)


dry = scene()
out = record(dry)
generate_wav(out)
```